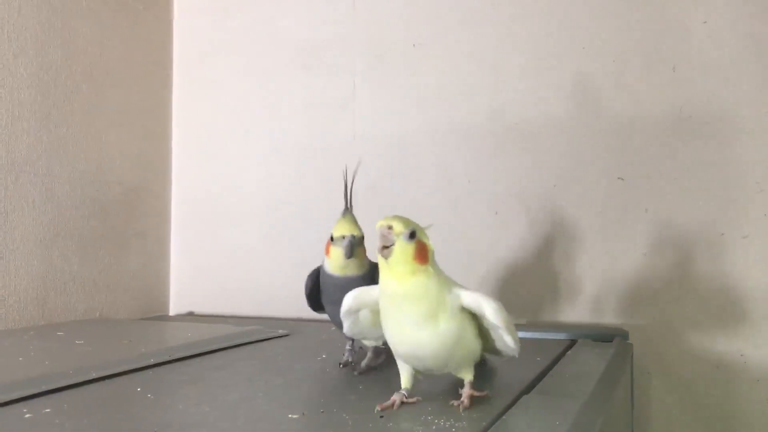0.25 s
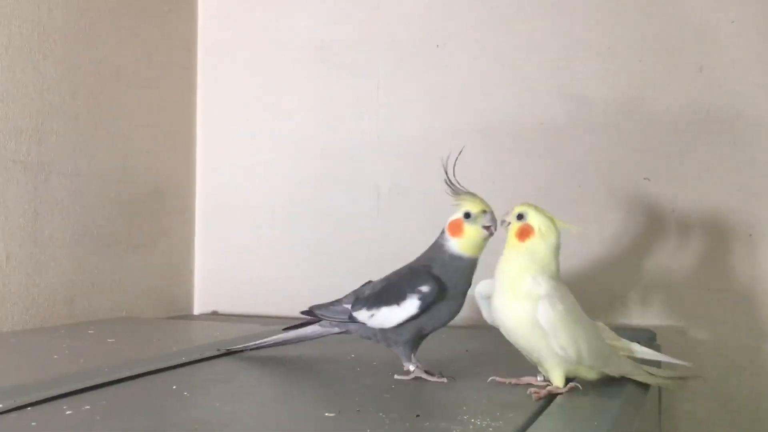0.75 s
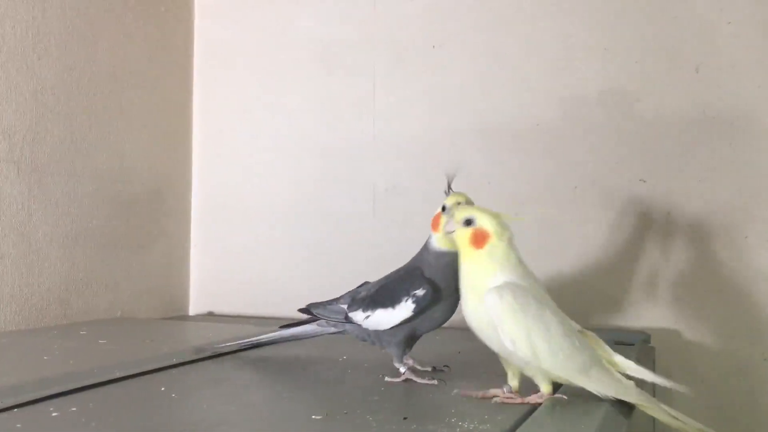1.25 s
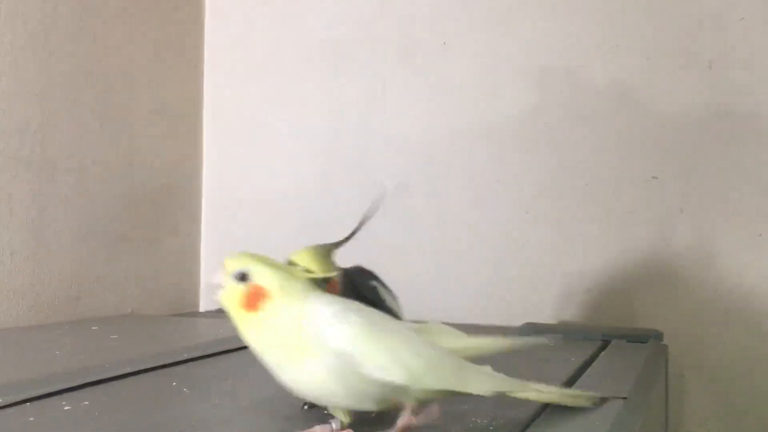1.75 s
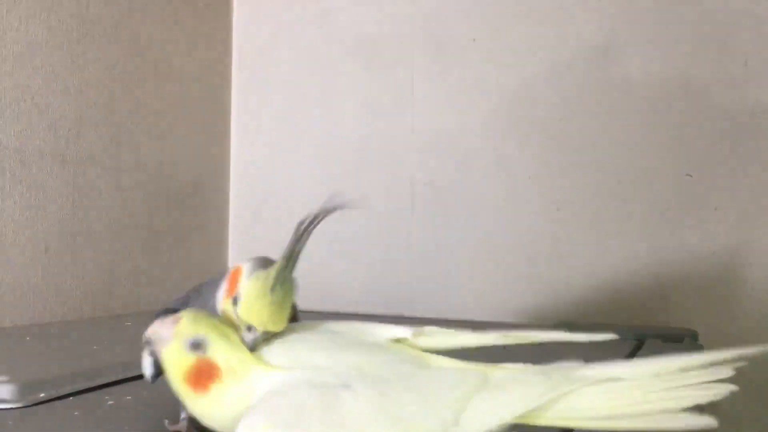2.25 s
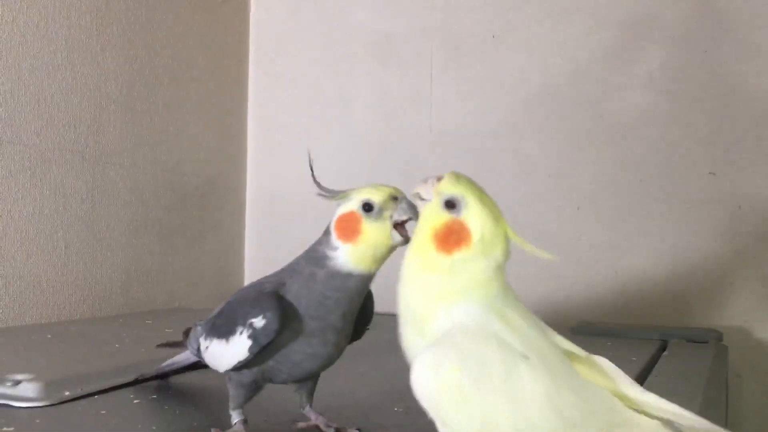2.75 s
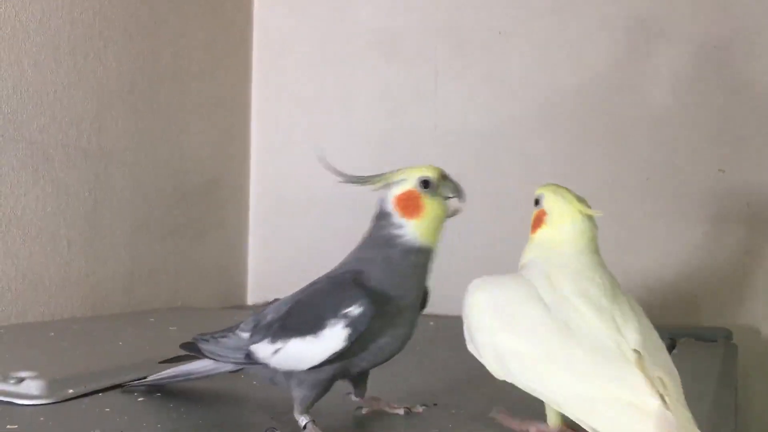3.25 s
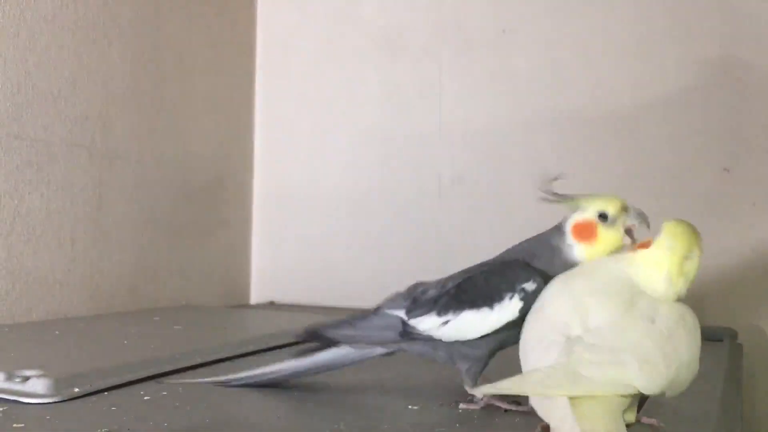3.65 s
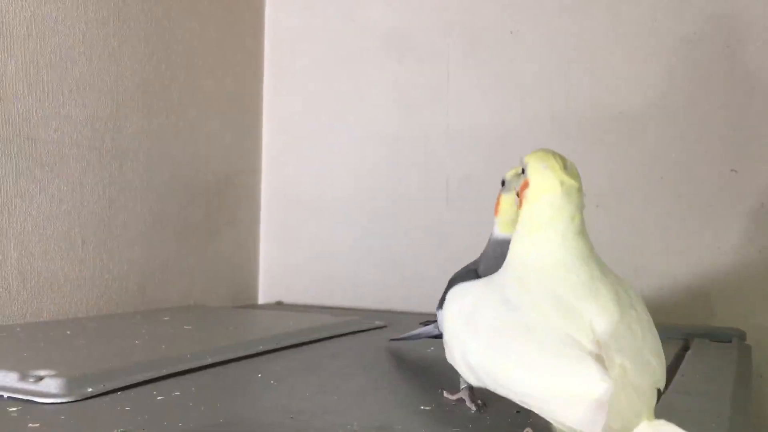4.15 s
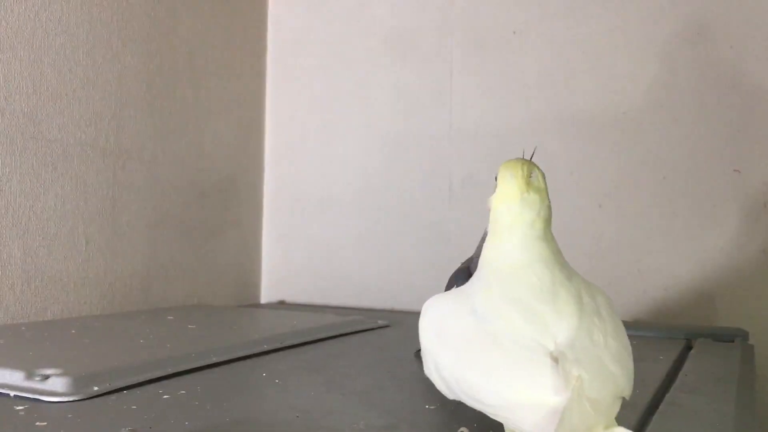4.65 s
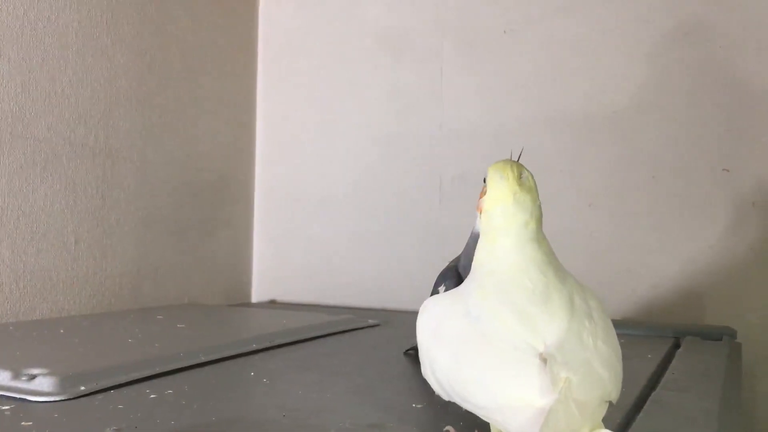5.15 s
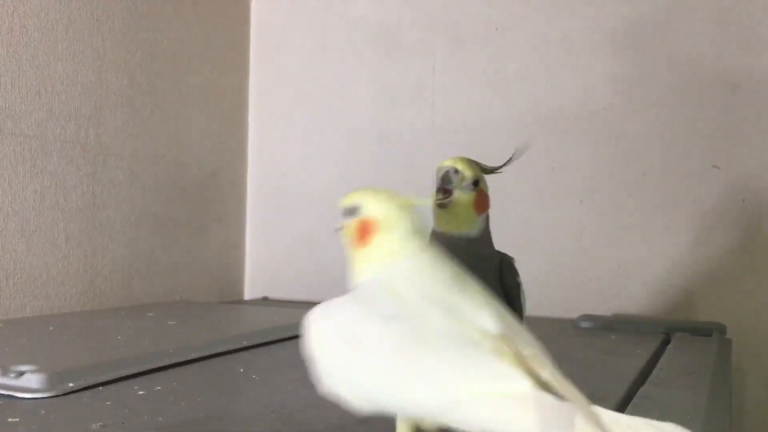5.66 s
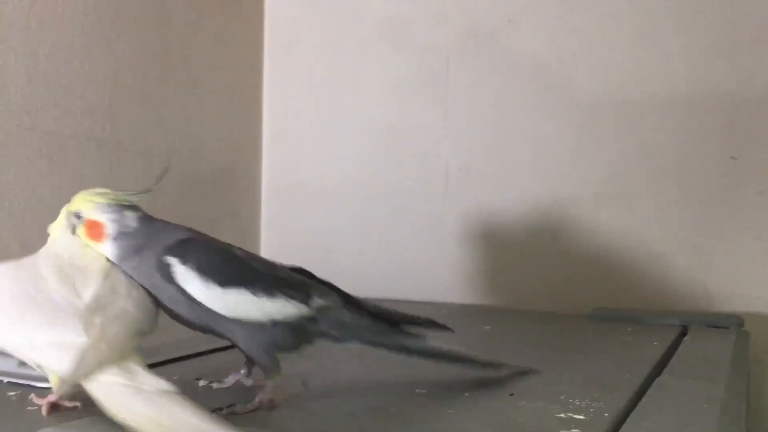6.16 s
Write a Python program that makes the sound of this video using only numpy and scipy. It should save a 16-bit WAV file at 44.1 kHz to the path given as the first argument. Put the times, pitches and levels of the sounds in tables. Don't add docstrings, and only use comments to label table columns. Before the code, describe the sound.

Indoors, near the microphone, a courting cockatiel sings in short bursts separated by small pauses. Clear sliding whistles alternate with rougher chatter and brief squawks, each with a short room ring. Irregular claw taps and light rustling on sheet metal become more noticeable near the end; a refrigerator hums quietly underneath.

```python
import sys
import numpy as np
from scipy import signal
from scipy.fft import rfft, irfft
from scipy.io import wavfile
from scipy.ndimage import uniform_filter1d

SR = 44100
rng = np.random.default_rng(int(sys.argv[2]) if len(sys.argv) > 2 else 0)


def invert_db(x):
    u = np.asarray(x, float) / 20
    return 10 ** u


def inscribe(sig):
    pcm = np.round(np.clip(np.atleast_2d(sig).T, -1, 1) * 32767)
    wavfile.write(sys.argv[1], SR, pcm.astype(np.int16))


N = 282681


def at_hz(points, hz):
    points = np.array(points)
    return np.interp(np.log(np.maximum(hz, 1)), np.log(points[:, 0]), points[:, 1])


def rms_one(x):
    return x / np.sqrt(np.mean(x ** 2) + 1e-20)


def coloured(x, points):
    return irfft(rfft(x) * invert_db(at_hz(points, np.fft.rfftfreq(len(x), 1 / SR))), len(x))


def drift(rate_hz):
    r = np.exp(-2 * np.pi * rate_hz / SR)
    return rms_one(signal.lfilter([1], [1, -2 * r, r * r], rng.standard_normal(N + SR))[SR:])


def shake(top_hz):
    low_pass = signal.butter(6, top_hz, fs=SR, output="sos")
    return rms_one(signal.sosfilt(low_pass, rng.standard_normal(N)))


def swell_and_fade(t, start, end, ramp_s=0.0069):
    return np.clip(np.minimum(t - start, end - t) / ramp_s, 0, 1)


def air(level_db=-57):
    # (frequency [Hz], density [dB per Hz])
    air_colour = [(24, -55), (45, -7), (100, -11), (200, -16), (400, -21), (900, -24), (1600, -26),
                  (2800, -31.5), (4500, -40), (8000, -42), (12000, -47.5), (16000, -52)]
    return invert_db(level_db + drift(2.5) / 2) * rms_one(coloured(rng.standard_normal(N), air_colour))


def compressor(wobble_db=0.3):
    # (frequency [Hz], rms level [dB])
    hum = [(39, -58.5), (60, -63), (86, -59), (92, -57), (117, -66.5), (170, -74.5)]
    t = np.arange(N) / SR
    out = np.zeros(N)
    for hz, db in hum:
        level = np.sqrt(2) * invert_db(db + wobble_db * drift(3))
        out += level * np.sin(2 * np.pi * (hz * t + rng.random()))
    return out


def shuffle(lumpy_db=5.5, ramp_share=0.058):
    # (start [s], length [s], rms level [dB])
    rustles = [(1.517, 0.22, -55), (1.74, 0.6, -60), (2.2, 0.035, -68), (5.574, 0.32, -63),
               (5.862, 0.21, -55), (6.125, 0.144, -51.5), (5.8, 0.024, -53), (5.938, 0.026, -60.5),
               (7.1, 0.045, -38), (4, 0.17, -52.5)]
    # (frequency [Hz], density [dB per Hz])
    feathers = [(150, -4), (350, 0), (1000, 4.5), (2200, -4), (4000, -19), (8000, -15.5), (16000, -22.5)]
    t = np.arange(N) / SR
    level = np.zeros(N)
    for start, length, db in rustles:
        level += invert_db(db) * swell_and_fade(t, start, start + length, ramp_share * length)
    return level * invert_db(lumpy_db * drift(25)) * rms_one(coloured(rng.standard_normal(N), feathers))


def claws(scratch_s=0.0047, knock_s=0.0053, split_hz=4500, body_hz=1100, knock_db=2.5, ring_db=-24):
    # (frequency [Hz], level [dB], T60 [s])
    sheet = [(420, 0, .06), (600, -2, .05), (760, -5, .04), (930, -5, .04), (1080, -3, .045),
             (1350, -3, .04)]
    # (time [s], peak level [dB], dull body against the
    # peak [dB])
    steps = [(0.2913, -48.5, 9), (0.4225, -58, 2), (0.4628, -52, -16), (0.521, -47, -31),
             (0.631, -45, 10), (0.7287, -82, -12), (0.8709, -27.5, -6.5), (1.0066, -47.5, -4),
             (1.0974, -58, -7), (1.2275, -50.5, -16), (1.4036, -50.5, 12.5), (1.472, -51.5, -6.5),
             (1.518, -48.5, 4), (1.592, -39, 11), (1.603, -44, 3.5), (1.667, -33.5, -17),
             (1.769, -62, -4), (1.8785, -33.5, 3.5), (1.986, -48, -1), (2.0388, -63.5, -14),
             (2.084, -54.5, 11), (2.2606, -57.5, 17), (2.5372, -50, 17.5), (2.7449, -54, 0),
             (2.8076, -63, 32.5), (2.812, -60.5, -2), (6.407, -45, 10), (3.1112, -58, -3.5),
                (3.2157, -56, -9.5), (3.2836, -44.5, -4.5), (3.365, -50, -8), (3.386, -28, -11),
                (3.6063, -33.5, 8.5), (3.86, -25.5, 4.5), (5.501, -52.5, -9), (5.5658, -50, -8),
                (5.609, -60, -14), (5.688, -58.5, -16.5), (5.722, -53.5, 6), (5.801, -49, 7.5),
                (5.8753, -50, -2), (5.94, -49.5, 5), (5.989, -45, -7), (6.0096, -47.5, 16),
                (6.119, -39, 11.5), (6.2227, -54, 13), (6.342, -31, 1)]
    near_s, near_db = 5.65, 9
    t = np.arange(int(.12 * SR)) / SR
    bright = signal.butter(2, split_hz, "high", fs=SR, output="sos")
    dull = signal.butter(2, [body_hz, split_hz], "band", fs=SR, output="sos")
    modes = np.array([invert_db(db - 60 * t / t60) * np.sin(2 * np.pi * hz * t) for hz, db, t60 in sheet])
    out = np.zeros(N + len(t))
    for s, peak_db, body_db in steps:
        scratch = signal.sosfilt(bright, rng.standard_normal(len(t)) * np.exp(-t / scratch_s))
        knock = invert_db(knock_db) * signal.sosfilt(dull, rng.standard_normal(len(t)) * np.exp(-t / knock_s))
        strike = rng.standard_normal(len(sheet))
        ring = invert_db(ring_db + near_db * (s > near_s)) * strike @ modes
        start = int(s * SR)
        out[start:start + len(t)] += invert_db(peak_db) * (scratch + invert_db(body_db) * (knock + ring))
    return out[:N]


def throat_db(hz):
    # (frequency [Hz], gain [dB])
    throat = [(1000, 4), (1500, -1.5), (2100, -2), (2800, -4.5), (3500, 2.5), (4500, -3), (5600, 0.5),
              (8500, -21)]
    return at_hz(throat, hz)


def upper_partials(phase, hz, level_db, rasp, haze, slope_db, at, waver, flutter):
    # (frequency [Hz], gain [dB])
    beak = [(4000, -12), (6500, -1), (8000, -12), (10000, -26.5), (11500, -14.5), (13000, -15),
            (15500, -9.5)]
    out = 0
    for k in range(4, 14):
        fade_db = 4 * waver[at - 4000 * k] - 12 * rasp * (k - 4)
        fade_db = fade_db + slope_db * np.maximum(k * hz - 9000, 0) / 1e3
        grain = 1 + haze + 0.6 * flutter[at - 3000 * k]
        audible = k * hz < .4 * SR
        out = out + grain * invert_db(level_db + fade_db + at_hz(beak, k * hz)) * audible * np.sin(k * phase)
    return out


def uneven_cycles(phase, t, first_db, half_db, sway):
    # (multiple of half the pitch, level [dB])
    half_lines = [(1, -7), (3, -3), (5, -16)]
    # (start [s], length [s], level against the fundamental [dB])
    quarters = [
        (2.035, 0.051, -27.5),
        (4.0, .13, -37.5),
        (2.7, 0.062, -45),
    ]
    out = 0
    for k, line_db in half_lines:
        out = out + invert_db(first_db + half_db + line_db + 5 * sway) * np.sin(k * phase / 2)
    for start, length, quarter_db in quarters:
        lines = sum(np.sin(k * phase / 4) * 3 / k for k in (2, 3, 5, 7))
        out = out + swell_and_fade(t, start, start + length) * invert_db(first_db + quarter_db + 4 * sway) * lines
    return out


def gasps(breath):
    # (start [s], length [s], rms level [dB])
    bursts = [(1.591, 0.026, -40.5), (2.045, 0.027, -42), (2.326, 0.019, -42.5), (2.364, 0.058, -44.5),
              (2.651, 0.033, -48), (2.736, 0.0069, -49.5), (2.79, 0.032, -52), (3.047, 0.047, -46),
              (4.002, 0.066, -52.5), (4.112, 0.021, -44.5), (4.455, 0.059, -46.5), (5.353, 0.047, -51.5),
              (0.769, .04, -54.5), (6.207, 0.042, -42), (3.389, 0.095, -60)]
    out = np.zeros(N)
    for s, length, db in bursts:
        span = slice(int(s * SR), int((s + length) * SR))
        out[span] += invert_db(db) * np.sqrt(np.hanning(span.stop - span.start)) * breath[span]
    return out


def song():
    # (time [s], pitch [Hz], level [dB])
    rise_and_long_call = [
        [(0, 2150, -39.5), (0.03, 2260, -69.5)],
        [(0.05, 1800, -44), (0.068, 1940, -42.5), (0.085, 2044, -19), (0.118, 2082, -26), (0.14, 2386, -11.5),
         (0.175, 2624, -10.5), (0.2, 2769, -12.5), (0.225, 2923, -35.5), (0.27, 2917, -26)],
        [(0.398, 1150, -34), (0.415, 1068, -49), (0.45, 1086, -32.5), (0.465, 1170, -34.5),
         (0.478, 1175, -43.5)],
        [(0.478, 1154, -32.5), (0.505, 1549, -26.5), (0.56, 1555, -24), (0.615, 1646, -22.5),
         (0.662, 1953, -21), (0.72, 2043, -20), (0.766, 1836, -23.5), (0.798, 1211, -37.5), (0.83, 1306, -34)],
    ]
    chatter = [
        [(1.598, 1630, -37.5), (1.612, 1700, -30.5), (1.615, 1821, -20.5), (1.645, 1993, -18.5),
         (1.67, 2034, -16), (1.7, 2066, -22), (1.73, 2183, -14), (1.752, 2218, -25), (1.77, 2270, -33.5)],
        [(1.793, 2396, -26.5), (1.81, 2670, -20.5), (1.822, 2683, -12.5), (1.835, 2703, -13),
         (1.85, 2763, -9.5), (1.862, 2743, -19), (1.878, 3150, -39.5)],
        [(2.022, 2277, -33), (2.04, 2710, -20.5), (2.098, 2654, -14), (2.11, 2948, -19.5), (2.138, 2930, -13),
         (2.158, 2752, -11.5), (2.175, 2770, -20), (2.19, 2790, -44)],
        [(2.327, 2470, -18), (2.343, 2630, -28), (2.352, 2680, -11.5), (2.368, 2690, -19), (2.385, 2789, -11.5),
         (2.425, 2904, -19), (2.466, 2730, -11.5), (2.476, 3120, -15), (2.5, 3270, -58)],
    ]
    rise_and_held_note = [
        [(2.652, 2050, -36), (2.665, 2230, -27), (2.68, 2372, -12), (2.688, 2533, -18), (2.7, 2565, -10.5),
         (2.715, 2730, -12), (2.73, 2754, -11.5), (2.748, 3210, -31)],
        [(2.797, 2600, -27.5), (2.808, 2685, -23.5), (2.824, 2350, -36.5)],
        [(2.81, 2050, -25), (2.826, 1798, -28), (2.858, 1949, -17.5), (2.915, 1933, -16), (2.94, 1887, -20),
         (3.02, 1900, -20.5), (3.042, 1834, -23.5), (3.065, 1622, -30.5), (3.09, 1182, -40.5)],
    ]
    squawks = [
        [(3.386, 1540, -45.5), (3.392, 1574, -28.5), (3.405, 1662, -34.5), (3.425, 1747, -16.5),
         (3.44, 1846, -21.5), (3.455, 1890, -13), (3.47, 1969, -14), (3.483, 2095, -8)],
        [(3.484, 2345, -16.5), (3.5, 2503, -22.5), (3.52, 2448, -20), (3.535, 2225, -9.5)],
        [(3.548, 1700, -34.5), (3.558, 1770, -24.5), (3.615, 1847, -27.5), (3.645, 1974, -21.5),
         (3.665, 2026, -18), (3.68, 2132, -21), (3.7, 2188, -32.5), (3.72, 2450, -39.5)],
        [(3.749, 2467, -17.5), (3.765, 2640, -18), (3.777, 2710, -18.5), (3.785, 2740, -10.5),
         (3.792, 2750, -8.5), (3.807, 2390, -18)],
        [(3.812, 3150, -27.5), (3.822, 3055, -26), (3.84, 3300, -38.5)],
        [(3.98, 2840, -31), (4.008, 2744, -21.5), (4.028, 2687, -13), (4.065, 2558, -21.5), (4.085, 2870, -28),
         (4.1, 2937, -31.5), (4.115, 2536, -15.5), (4.135, 2480, -18)],
    ]
    whistles = [
        [(4.287, 1830, -50), (4.305, 2040, -21.5), (4.35, 2157, -23), (4.39, 2274, -16.5), (4.42, 2292, -9.5),
         (4.443, 2264, -17.5), (4.455, 2016, -19.5), (4.47, 1484, -30), (4.482, 1136, -39)],
        [(4.627, 1920, -35), (4.65, 2050, -20), (4.672, 2120, -17.5), (4.695, 2192, -23), (4.715, 2394, -12.5),
         (4.75, 2528, -14), (4.772, 2617, -11.5), (4.79, 2662, -17.5), (4.835, 2875, -41)],
        [(4.972, 1050, -50), (4.99, 1084, -44), (5.03, 1099, -35), (5.062, 1087, -38)],
        [(5.062, 1113, -31.5), (5.1, 1442, -30), (5.15, 1486, -23.5), (5.235, 1662, -20.5), (5.27, 1884, -26),
         (5.31, 1934, -20.5), (5.345, 1812, -24), (5.37, 1430, -35), (5.42, 1163, -44)],
    ]
    last_phrase = [
        [(6.122, 1640, -34.5), (6.14, 1888, -30), (6.16, 1903, -19.5), (6.185, 1983, -21), (6.21, 2012, -22),
         (6.235, 1988, -21.5), (6.255, 1994, -24), (6.27, 1957, -16.5), (6.31, 2010, -83)],
        [(6.317, 2440, -32), (6.333, 2680, -14), (6.348, 2633, -13), (6.36, 2750, 2.5)],
        [(6.364, 2370, -3.5), (6.375, 2320, -21), (6.405, 2354, -39)],
    ]
    notes = rise_and_long_call + chatter + rise_and_held_note + squawks + whistles + last_phrase
    # (second partial [dB], third partial [dB],
    # upper partials [dB], half lines [dB], breath [dB])
    voices = [(-30.5, -28.5, -34.5, -27.5, -32.5), (-32, -24.5, -22, -51.5, -35),
              (-13, -45, -28, -48.5, -30), (-23.5, -26.5, -35, -47.5, -37),
              (-12.5, -19.5, -21.5, -48, -36.5), (-27, -37.5, -22.5, -50.5, -41.5),
              (-33.5, -34, -15.5, -37, -32.5), (-34, -35, -8, -41.5, -46.5), (-28, -31, -19.5, -42, -45.5),
              (-25, -19, -32, -40.5, -43.5), (-30, -23, -31, -44, -45.5), (-2, -16.5, -15, -59, -64.5),
              (-24, -34, 0, -49, -34), (-18, -18, -26, -45, -43.5), (-26, -23.5, -21, -47.5, -41),
              (-14.5, -21, -9, -29.5, -47.5), (-32, -17.5, -29.5, -41, -34),
              (-23.5, -31.5, -29, -57.5, -36), (-29.5, -30.5, -23, -56, -37), (-7, -30, -34, -46, -58),
              (-22, -30, -35.5, -40.5, -44), (-14.5, -15.5, -23, -41, -32), (-29, -45, -21, -53, -45),
              (-25, -30, -31, -35, -51)]
    strains = [.05, .04, .02, .02, .07, .06, .12, .1, .05, .5, .09, .45, .3, .15, .1, .05, .12, .02, .02,
               .02, .03, .1, .08, .08]
    half_trends = [-4, -91, 2, -88, 4, 4, -140, 13, 1, 4, -13, 9.5, 4, -1.5, 2.5, -3, -120, 3.5, 1, -8, -84,
                   -5, -1.5, -6]
    second_trends = [3, 5, 4, -7, 3, -4, 35.5, -88, 3.5, 0.5, 9.5, 8, -87.5, 19, -4, 6, -46, 169, 1, -5,
                     -5.5, 39, 3, 1]
    # (haze against the partials [dB], slope of the upper partials above 9 kHz
    # [dB/kHz])
    grains = [(-18.5, 2), (-5, .3), (-17, 0), (-13, 2), (-8.5, -1.3), (-9, 1), (-7.5, 0.5), (-4.5, 0),
              (-7.5, 1), (-4, 2.5), (-8, -0.5), (-1, 2.2), (-2, -2), (-5.5, -1), (-3.5, -1.5), (-3.5, -0.5),
              (-2, 0), (-16, 1.5), (-11, 0.6), (-16.5, 1), (-10, 1.5), (-6.5, -1.5), (-6.5, 0.5),
              (-6, -0.5)]
    # (frequency [Hz], density [dB per Hz])
    breath_colour = [(500, -31.5), (1000, -1.5), (1700, 3), (2600, -9.5), (4000, -14.5), (8000, -20.5),
                     (12000, -25), (16000, -28)]
    effort_s, puff_s, puff_db = 0.025, 0.039, -24
    steady_strain = .14

    out = np.zeros(N)
    tremor, flutter, waver = shake(200), shake(280), drift(40)
    turbulence = np.resize(tremor[::4], N)
    breath = rms_one(coloured(rng.standard_normal(N), breath_colour))
    for rows, voice, rasp, half_trend, second_trend, (haze_db, slope_db) in zip(
            notes, voices, strains, half_trends, second_trends, grains):
        second_db, third_db, upper_db, half_db, breath_db = voice
        s, pitch, level = np.transpose(rows)
        at = np.arange(int(s[0] * SR), min(int(s[-1] * SR), N))
        t = at / SR
        from_middle = t - t.mean()
        hz, first_db = np.interp(t, s, pitch), np.interp(t, s, level)

        effort_db = uniform_filter1d(first_db - throat_db(hz), int(effort_s * SR), mode="nearest")
        effort_db = effort_db + 0.18 * (effort_db - effort_db.max())
        drop = np.maximum(-np.gradient(np.log2(hz), t), 0)
        fall = uniform_filter1d(drop, int(effort_s * SR / 2), mode="nearest")
        effort_db = effort_db - 0.65 * fall - 15.7 * max(second_db + 24, 0) * from_middle
        second_db = effort_db + second_db + second_trend * from_middle + throat_db(2 * hz)
        third_db = effort_db + third_db + throat_db(3 * hz)

        pitch_strain = min(rasp, steady_strain)
        hz = hz * (1 + 6 * pitch_strain * waver[::-1][at] / 100)
        tremor_pct = 5.8 * pitch_strain + 0.15 * fall
        phase = 2 * np.pi * np.cumsum(hz * (1 + tremor_pct * tremor[at] / 100)) / SR

        haze = invert_db(haze_db) * turbulence[at]
        flicker = 3.5 * np.clip(rasp, steady_strain / 3, 2 * steady_strain)
        low_haze = invert_db(-16.5) * haze
        second_ragged = 1 + flicker * flutter[::-1][at] + low_haze
        third_ragged = 1 + flicker * tremor[at] + low_haze
        note = invert_db(first_db) * np.sin(phase)
        note += second_ragged * invert_db(second_db) * np.sin(2 * phase)
        note += third_ragged * invert_db(third_db) * np.sin(3 * phase)
        upper_level_db = (first_db + third_db) / 2 + 12.5 + upper_db
        note += upper_partials(phase, hz, upper_level_db, rasp, haze, slope_db, at, waver, flutter)
        note += uneven_cycles(phase, t, first_db, half_db + half_trend * from_middle, waver[at])
        note *= np.sqrt(2 / (1 + rasp ** 2)) * (1 + rasp * flutter[at])

        puff = invert_db(first_db.max() + puff_db) * np.exp(-(t - t[0]) / puff_s)
        leak = invert_db(first_db - 38 + 4.4 * waver[at]) + invert_db(-4.5) * puff
        note += invert_db(breath_db + 25.5) * leak * breath[at]
        out[at] += note * swell_and_fade(t, t[0], t[-1])
    return out + gasps(breath)


def room(x):
    # (frequency [Hz], T60 [s])
    room_t60 = [(300, 0.29), (1400, 0.25), (2000, 0.21), (6000, 0.18), (15000, 0.33)]
    late_db, late_t60_s = -22, 0.72
    wet_db, corner_db, corner_s = -8, -5, .022
    t = np.arange(int(.7 * SR)) / SR
    tail = 0
    for hz in 180 * 2. ** np.arange(7):
        band = signal.butter(2, [hz / np.sqrt(2), hz * np.sqrt(2)], "band", fs=SR, output="sos")
        decay = invert_db(-60 * t / at_hz(room_t60, hz)) + invert_db(late_db - 60 * t / late_t60_s)
        tail = tail + signal.sosfilt(band, rng.standard_normal(len(t))) * decay
    tail *= np.clip(t / 0.00093, 0, 1)
    hits = rng.random(len(t)) < 900 / SR
    corner = rng.standard_normal(len(t)) * hits * np.exp(-t / corner_s) * (t > .0015)
    echoes = invert_db(wet_db) * tail / np.linalg.norm(tail) + invert_db(corner_db) * corner / np.linalg.norm(corner)
    return x + signal.fftconvolve(x, echoes)[:N]


def throbs(width_s=0.0018):
    # (time [s], swell or dip [dB])
    meetings = [(4.411, -5.5), (0.153, -12), (.178, -7), (0.187, -4.5), (.197, 0.5), (.208, 3),
                (0.504, -10.5), (0.673, -7), (0.686, -4), (.703, -2), (0.717, -7.5), (0.765, 2.5),
                (1.729, 1.5), (1.835, 4), (1.843, 0.5), (2.07, 0), (2.115, 3), (2.119, -7), (2.15, -10),
                (2.155, 4), (2.173, 4), (2.343, -3), (2.372, -8.5), (2.384, -3), (2.468, 3.5),
                (2.678, -4.5), (2.709, 2.5), (2.725, -2), (2.741, -3), (2.934, -10), (2.953, -4.5),
                (3.031, -4), (3.46, -3), (3.616, 2), (3.64, -3), (3.697, 2), (3.778, -4.5), (3.798, 0.5),
                (4.007, -7.5), (4.017, 4.5), (4.038, -9), (4.047, -10.5), (4.068, -5), (4.107, 7.5),
                (4.128, -7), (4.701, -12), (4.775, 3), (4.792, -5), (5.119, -7), (5.303, -6), (5.336, -4),
                (5.344, 5.5), (6.177, -3), (6.2, -2), (6.263, -12), (6.269, 4.5), (6.274, -13), (6.342, -6),
                (6.36, 5), (6.375, -8)]
    t, gain_db = np.arange(N) / SR, np.zeros(N)
    for s, db in meetings:
        span = slice(int((s - .02) * SR), int((s + .02) * SR))
        gain_db[span] += db * np.exp(-.5 * ((t[span] - s) / width_s) ** 2)
    return invert_db(gain_db)


def scene():
    background = air() + compressor() + shuffle()
    return (background + throbs() * room(song() + claws()))[None]


def band_limit(x):
    return signal.sosfilt(signal.butter(12, 16820, fs=SR, output="sos"), x)


def record(dry, ratio=0.089, threshold_db=-40, release_db_s=25, makeup_db=2.5, ceiling=2.5, cutoff_hz=15760):
    level_db = 10 * np.log10(uniform_filter1d(dry[0] ** 2, size=441) + 1e-12)
    ramp = release_db_s * np.arange(N) / SR
    held_db = np.maximum.accumulate(level_db + ramp) - ramp
    gain_db = uniform_filter1d(-ratio * np.maximum(held_db - threshold_db, 0), size=441)
    clipped = ceiling * np.tanh(dry * invert_db(gain_db + makeup_db) / ceiling)
    top_cut = signal.ellip(10, .5, 55, cutoff_hz, fs=SR, output="sos")
    return band_limit(signal.sosfilt(top_cut, clipped))


dry = scene()
out = record(dry)
inscribe(out)
```